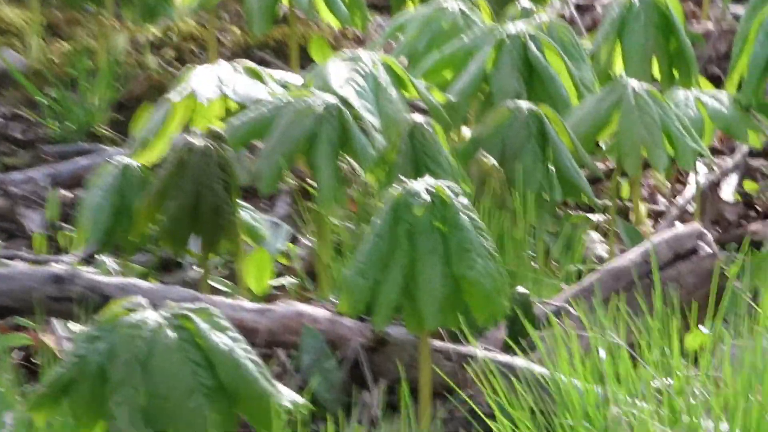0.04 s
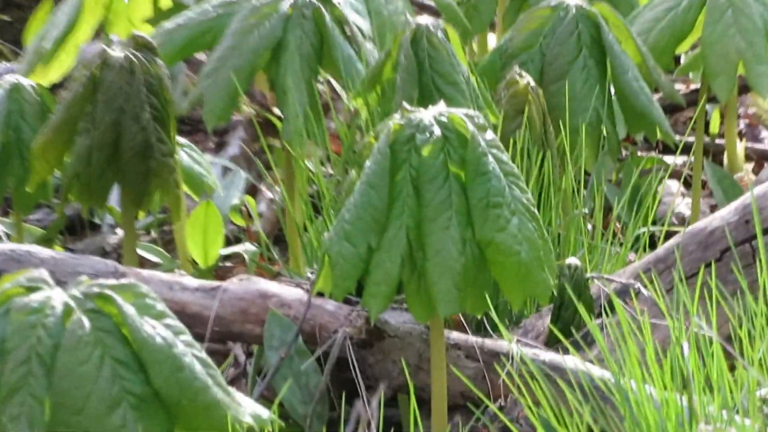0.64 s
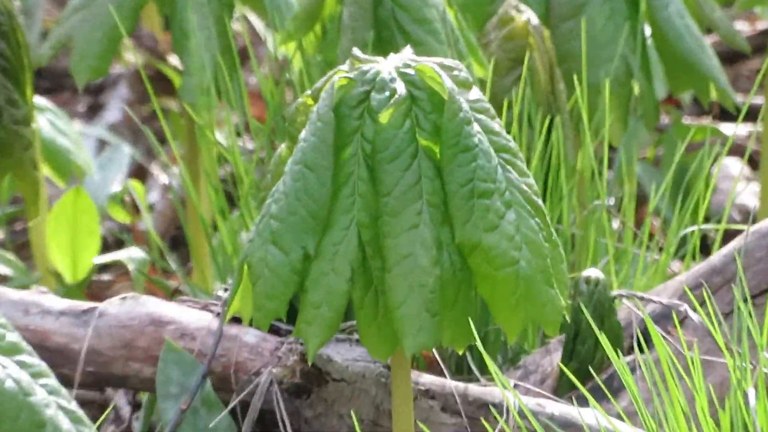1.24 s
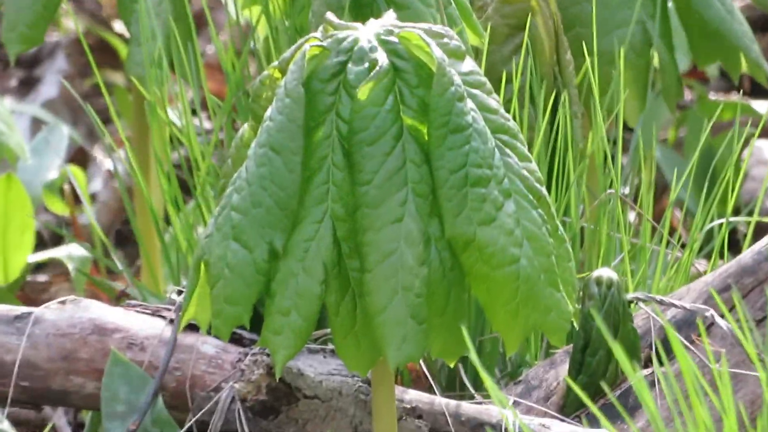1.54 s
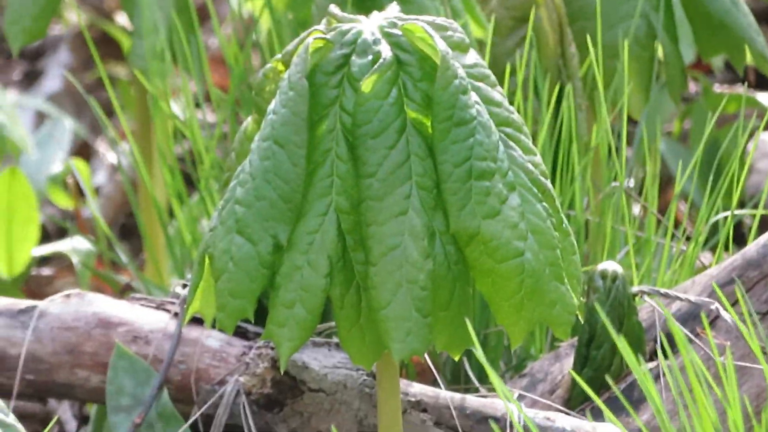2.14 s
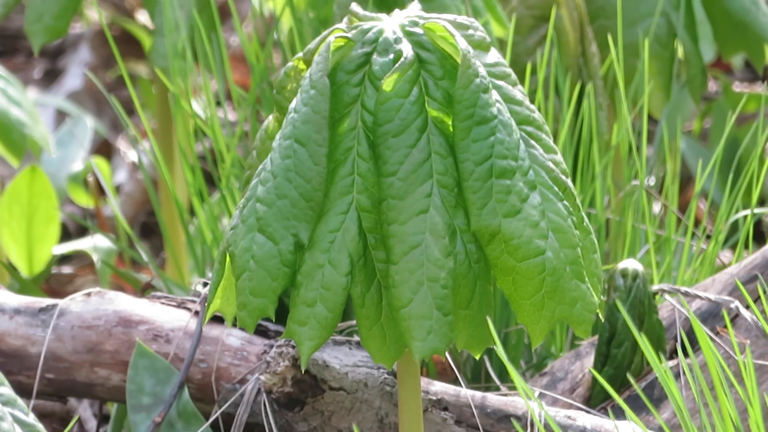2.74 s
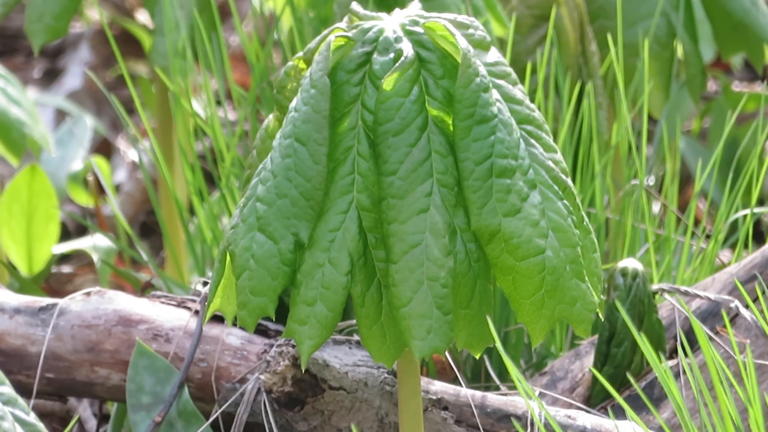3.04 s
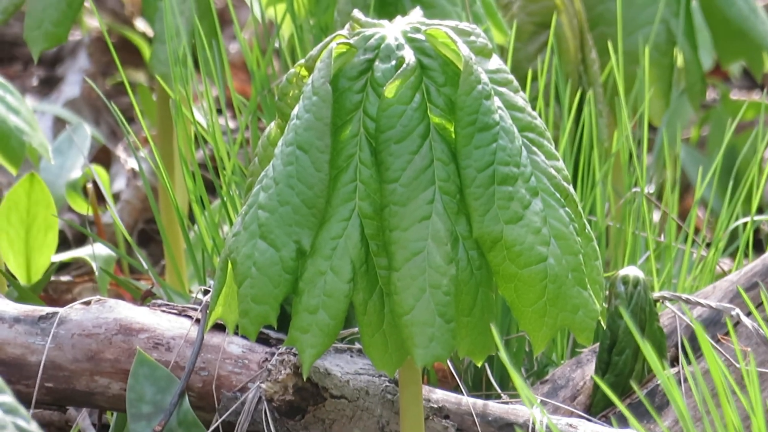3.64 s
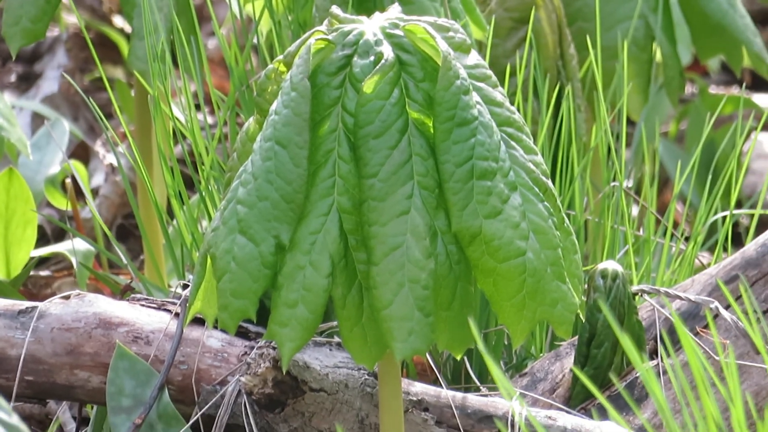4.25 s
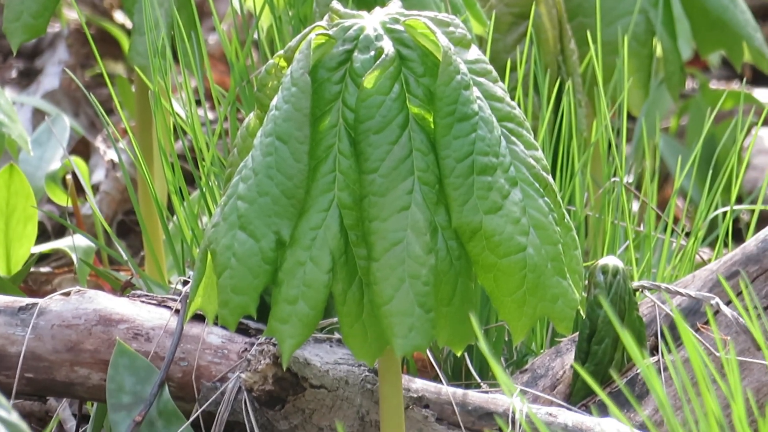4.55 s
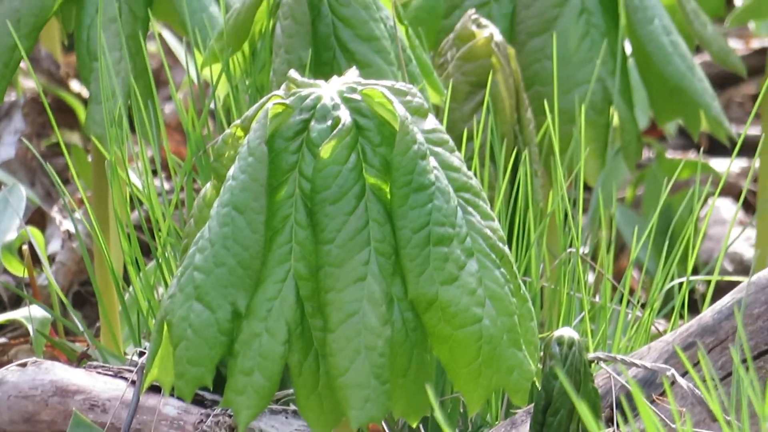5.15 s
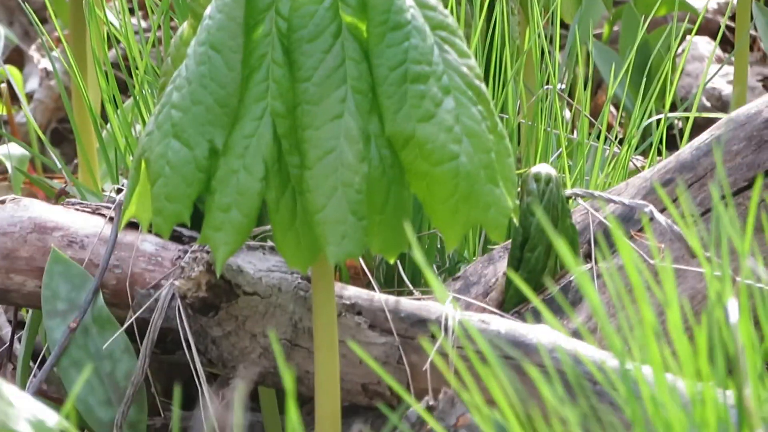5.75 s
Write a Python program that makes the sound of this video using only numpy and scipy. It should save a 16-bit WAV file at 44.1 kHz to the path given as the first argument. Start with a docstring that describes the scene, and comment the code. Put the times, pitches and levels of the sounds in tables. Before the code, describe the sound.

A treefrog gives two fast, raspy trills and a falling chirp in woods, with another frog farther off and a distant vehicle approaching.

```python
"""Spring woods near a distant road. A treefrog trills twice, then gives one falling chirp.
Each pulse is a rasp and a short upward slur through its throat and vocal sac; the trunks throw it back.
A second frog calls farther off. A vehicle slowly draws nearer, over hiss and soft buffets of air.
At first a camera's zoom motor hisses faintly, then stops with a tick."""
import sys
import numpy as np
from scipy import signal
from scipy.fft import rfft, irfft
from scipy.io import wavfile
from scipy.ndimage import uniform_filter1d

SR = 44100
rng = np.random.default_rng(int(sys.argv[2]) if len(sys.argv) > 2 else 0)


def output_pcm(signal):
    """Save a mono or channel-first signal as 16-bit PCM at the path in sys.argv[1].

    Samples are clipped to [-1, 1] before scaling.
    """
    pcm = np.clip(np.atleast_2d(signal).T, -1, 1) * 32767
    wavfile.write(sys.argv[1], SR, np.round(pcm).astype(np.int16))


N = 265173
TIME_S = np.arange(N) / SR
NOISE_BINS_HZ = np.fft.rfftfreq(2048, 1 / SR)

# Near frog, a long trill and a short one. Each row: start in seconds, level in dB,
# hoarseness (rasp share, 0-1), top pitch in Hz, overtone offset in dB.
TRILL_PULSES = [(0.64, -52, 0.18, 1084, 1), (0.706, -36, 0.084, 1134, -4.5),
                (0.771, -35.1, 0.058, 1151, -4.5), (0.841, -35, 0.13, 1125, -2.1),
                (0.911, -38, 0.14, 1120, -3), (0.974, -37.5, 0.26, 1100, -5),
                (1.04, -37.0, 0.17, 1088, -1.1), (1.11, -38.5, 0.27, 1091, -2),
                (1.179, -39.5, 0.31, 1106, 0), (1.252, -36.5, 0.26, 1102, -2), (1.323, -37, 0.28, 1079, -1),
                (1.402, -35, 0.16, 1123, 0), (1.474, -33, 0.25, 1108, -1.8), (1.551, -38, 0.31, 1071, -0.5),
                (1.625, -34.5, 0.21, 1108, -0.7), (1.7, -35, 0.3, 1068, 0), (1.78, -34.5, 0.39, 1098, -2),
                (1.861, -35, 0.37, 1068, -2.5), (1.949, -32.5, 0.24, 1115, 1),
                (2.031, -31.5, 0.27, 1141, -0.5), (2.113, -29.5, 0.21, 1114, -0.7),
                (2.188, -28, 0.21, 1117, -0.8), (2.27, -28, 0.18, 1109, -1), (2.347, -29, 0.17, 1120, 0.2),
                (2.423, -30, 0.27, 1102, -0.5), (2.501, -30, 0.2, 1097, -0.8),
                (2.579, -31, 0.283, 1094, -1), (2.663, -36, 0.44, 1097, 0.0),
                (2.748, -29, 0.21, 1110, -1.5), (4.611, -38.5, 0.05, 1120, -7.5),
                (4.672, -32, 0.091, 1119, -3.5), (4.722, -30.5, 0.17, 1106, 0.5),
                (4.774, -29.5, 0.27, 1107, -2.5), (4.83, -30.5, 0.2, 1103, -2.2),
                (4.893, -32, 0.28, 1090, 1), (4.956, -33.5, 0.33, 1082, 0.7), (5.026, -32, 0.3, 1067, 0),
                (5.095, -32.5, 0.46, 1074, 3), (5.165, -36, 0.59, 990, -10), (5.239, -41.5, 1.0, 1140, 1.8)]
# Throat and vocal sac response. Each row: frequency in Hz, gain in dB.
THROAT_RESPONSE = [(600, -38), (800, -29), (930, -5.5), (1070, 5.5), (1200, 1), (1360, 1.5), (1560, 7.5),
                   (1780, 0), (1910, 6.5), (2150, 3.5), (2330, -12), (2680, -14.5), (3090, -13.5),
                   (3300, -29.5), (4050, -27), (4600, -60), (5500, -70)]


def near_frog(jitter=0.017, shimmer=0.042, lock_s=0.0026, rasp_db=-8, grit_db=-16.5, attack_s=0.00053):
    """Each pulse locks from rasp into a rising tone; the second harmonic yields to the fundamental."""
    # Pulses lengthen along a trill. Each row: time in seconds, pulse length in seconds.
    pulse_lengths = [(.7, 0.02), (.91, 0.02), (1.1, 0.026), (1.8, 0.027), (2.3, 0.028), (2.75, 0.028),
                     (4.61, 0.034), (4.67, 0.0274), (4.76, 0.035), (5.1, .035), (5.24, 0.04)]
    # Each row: share of the slur, share of the top pitch.
    slur_curve = [(0, .65), (.2, .81), (.38, 0.84), (.7, 0.97), (.85, 0.96), (1, 1)]
    out, croak = np.zeros(N), rasp()
    order = np.arange(1, 6)[:, None]
    waver, flutter = drift(N, 500), drift(N, 500)
    for start_s, level_db, hoarse, top_hz, overtone_db in TRILL_PULSES:
        length_s, = follow(pulse_lengths, start_s)
        u = np.linspace(0, 1, int(length_s * SR))
        now = slice(int(start_s * SR), int(start_s * SR) + len(u))
        slur = ramp(u, 0.488 * hoarse)  # starts inside the rasp
        hz = top_hz * follow(slur_curve, slur)[0] * (1 + jitter * waver[now])
        closing_at = np.clip(0.7 + 0.1 * (level_db + 30), .3, .9)  # a harder push holds overtones longer
        closing = ramp(u, closing_at) ** 1.75
        second_db = overtone_db + 2 - 15.5 * closing
        upper_db = overtone_db - 1 + 11 * hoarse - 6.5 * closing
        gains = amp(colour(THROAT_RESPONSE, order * hz) + second_db * (order == 2) + upper_db * (order > 2))
        tone = unit((gains * np.sin(order * phase_rad(hz))).sum(0)) * (1 + shimmer * flutter[now])
        locked = .5 + .5 * np.tanh((u - 0.73 * hoarse) * length_s / lock_s)
        rasp_gain = (1 - locked) * amp(rasp_db) + locked * (1 - closing) * amp(grit_db)
        voice = locked * tone + amp(21.5 * hoarse) * rasp_gain * croak[now]
        pressure = (1 - np.exp(-u * length_s / attack_s)) * np.tanh((1 - u) * 14) ** 2
        leak = amp(-10 * hoarse * u ** 2)  # a hoarse pulse loses air
        add(out, start_s, amp(level_db) * unit(voice * pressure * leak))
    return out


def rasp(slap_hz=500, uneven=.25, onset_s=.0013, band_hz=(1050, 3800), sac_hz=1700, sac_width_hz=380):
    """Uneven vocal cord slaps open each pulse, ringing the sac and throat."""
    slaps = np.zeros(N)
    gaps_s = np.exp(uneven * rng.standard_normal((len(TRILL_PULSES), 18))) / slap_hz
    for (start_s, *_), row in zip(TRILL_PULSES, gaps_s):
        slaps[((start_s + onset_s + np.cumsum(row) - row[0]) * SR).astype(int)] = 1
    slaps = signal.sosfilt(signal.butter(2, band_hz, "bandpass", fs=SR, output="sos"), slaps)
    slaps += amp(6) * resonate(slaps, sac_hz, sac_width_hz)
    hz = np.fft.rfftfreq(N, 1 / SR)
    treble_db = 3 * np.clip(hz / 1000 - 2, 0, 1)
    croak = irfft(rfft(slaps) * amp(colour(THROAT_RESPONSE, hz) + treble_db), N)
    return croak / np.sqrt(np.sum(croak ** 2) / (gaps_s.sum() * SR))  # rms 1 while the cords slap


def chirp(start_s=5.4305, length_s=0.057, pitch_hz=746, sag=0.204, jitter=0.0081, shimmer=.08):
    """One lower note through the same throat: it swells, then sags in pitch and dies."""
    out, u = np.zeros(N), np.linspace(0, 1, int(length_s * SR))
    order = np.arange(1, 6)[:, None]
    hz = pitch_hz * (1 - sag * u ** 5.1) * (1 + jitter * drift(len(u), 400))
    level_db = -37.5 + 5 * np.exp(-((u - 0.62) / 0.25) ** 2)
    gains = amp(colour(THROAT_RESPONSE, order * hz) - order)  # tilt: -1 dB per harmonic
    voice = (gains * np.sin(order * phase_rad(hz))).sum(0) * (1 + shimmer * drift(len(u), 400))
    add(out, start_s, amp(level_db) * unit(voice) * signal.windows.tukey(len(u), .08))
    return out


def far_frog(pulse_s=0.0293, rise=0.097, octave_db=-20, jitter=0.006):
    """Slightly uneven trills; distance leaves little but each pulse's rising fundamental."""
    # Each row: start, end and pulse period in seconds, first level in dB, slope in dB/s, pitch in Hz.
    trills = [(0.027, .135, .072, -46.5, -78, 1175), (.25, .6, 0.073, -61, -6, 1240),
              (4.228, 4.72, .0651, -43.5, 0.5, 1219)]
    out, u = np.zeros(N), np.linspace(0, 1, int(pulse_s * SR))
    for start_s, end_s, period_s, first_db, db_per_s, pitch_hz in trills:
        for at_s in np.arange(start_s, end_s, period_s):
            phase = phase_rad(pitch_hz * (1 + rise * (u - .5) + jitter * drift(len(u), 200)))
            pulse = unit(np.sin(np.pi * u) * (np.sin(phase) + amp(octave_db) * np.sin(2 * phase)))
            level_db = first_db + db_per_s * (at_s - start_s) - rng.standard_normal()
            add(out, at_s, amp(level_db) * pulse)
    return out


def with_echoes(x):
    """The call, its echoes off the ground and nearest trunks, and narrow tones that linger."""
    # Each row: delay in seconds, gain in dB.
    echoes = [(.00366, -27), (.00463, -27.5), (.00575, -23), (.00632, -14.5), (0.0136, -17)]
    # Each row: frequency in Hz, bandwidth in Hz, gain in dB.
    lingering_tones = [(1560, 45, -5), (1933, 19.5, -5.5), (3040, 25, 8.5)]
    out = x.copy()
    for delay_s, db in echoes:
        add(out, delay_s, amp(db) * x)
    for hz, width_hz, db in lingering_tones:
        out += amp(db) * resonate(x, hz, width_hz)
    return out


def woods(x, gap_s=.022, taps_per_s=2500, early_db=2, early_s=0.038, width=0.21):
    """Scattering off many trunks: a short gap, a dense cluster, a faint long tail."""
    # Each row: frequency in Hz, t60 in seconds, relative level in dB.
    decay_bands = [(500, 0.4, -10), (1000, 0.39, 1.5), (1700, 0.63, -1.5), (1950, 0.27, 1), (2150, 0.25, 4),
                   (2580, 0.82, -6.5), (3150, 0.81, 0.5), (10000, 0.52, 1)]
    t = np.arange(SR) / SR
    taps = rng.standard_normal((2, SR)) * (rng.random((2, SR)) < taps_per_s / SR) * (t > gap_s)
    hz, age_s, bins = signal.stft(taps * (1 + amp(early_db) * np.exp(-t / early_s)), SR, nperseg=256)
    t60_s, tint_db = follow(decay_bands, hz[:, None])
    tails = signal.istft(bins * amp(tint_db - 60 * age_s / t60_s), SR, nperseg=256)[1]
    middle, side = signal.fftconvolve(x[None], tails / np.linalg.norm(tails[0]), axes=1)[:, :N]
    return np.array([middle + width * side, middle - width * side])


def road(engine_hz=79.1, slowing_from_s=2.5, slowing_hz_per_s=1.7, octave_db=-15):
    """The vehicle's approach lifts the tyre roar and, less, the rumble; its engine slows."""
    # Each row: time in seconds, level in dB.
    engine_levels = [(.5, -52), (2.5, -49.5), (3.2, -47), (3.35, -40.5), (5.3, -41.5), (6.01, -48.5)]
    tyre_levels = [(0, -54.5), (1.5, -52.5), (2.3, -48), (4.5, -46.5), (5.8, -40)]
    # Each row: frequency in Hz, relative density in dB.
    rumble_spectrum = [(20, -30), (35, -14.5), (60, -1), (100, 1), (130, -3), (170, -7.5), (220, -16.5),
                       (300, -29.5), (600, -31.5), (1500, -74)]
    tyre_spectrum = [(200, -12), (450, -9.5), (620, -12), (800, 1), (950, 4.5), (1200, -4.5), (1600, -5),
                     (2000, -6.5), (2600, -14.5), (4000, -23), (8000, -35.5), (15000, -42.5)]
    # Each row: frequency in Hz, left-right correlation.
    tyre_likeness = [(300, 0.27), (900, 1), (2000, 0.85), (4000, 0.62), (8000, 0.11)]
    phase = phase_rad(engine_hz - slowing_hz_per_s * np.maximum(TIME_S - slowing_from_s, 0))
    note = unit(np.sin(phase) + amp(octave_db) * np.sin(2 * phase))
    engine = amp(follow(engine_levels, TIME_S)[0]) * note
    roar_db, = follow(tyre_levels, TIME_S)
    rumble_db = -41.5 + 0.27 * (roar_db - roar_db.mean())
    rumble = amp(rumble_db) * noise(rumble_spectrum, likeness=0.99, patchy_db=1.06)
    tyres = amp(roar_db) * noise(tyre_spectrum, colour(tyre_likeness, NOISE_BINS_HZ))
    return engine + rumble + tyres


def zoom_motor(level_db=-53, stop_s=1.72, run_down_s=.02):
    """Motor hiss drives the two microphone ports in antiphase until the lens stops."""
    # Each row: frequency in Hz, relative density in dB.
    motor_spectrum = [(400, -7), (1000, -7), (2500, -2), (4500, -6.5), (8000, -13.5), (11500, -19),
                      (15000, -25)]
    running = .5 - .5 * np.tanh((TIME_S - stop_s) / run_down_s)
    return amp(level_db) * running * noise(motor_spectrum, likeness=-1)


def lens_ticks(attack_s=0.00054, scrape_s=0.0027):
    """Small snaps of the lens ring a few short modes, with a trace of scraping."""
    # Each row: start in seconds, peak in dB, phase between ports in radians, tilt in dB/octave.
    snaps = [(1.656, -43, 1.75, 12), (1.7598, -26, 1.1, 1), (5.668, -39, 2, 16)]
    # Each row: frequency in Hz, relative level in dB, t60 in seconds.
    lens_modes = [(1790, 0, 0.043), (3320, -9, 0.031), (3653, 13, 0.0062), (7377, 0, 0.003),
                  (12433, -22, 0.0033)]
    out, t = np.zeros((2, N)), np.arange(SR // 40) / SR
    for start_s, peak_db, apart_rad, db_per_octave in snaps:
        ring = sum(amp(db + db_per_octave * np.log2(hz / 4000) - 60 * t / t60_s)
                   * np.sin(2 * np.pi * hz * t) for hz, db, t60_s in lens_modes)
        scrape = 0.15 * rng.standard_normal(len(t)) * np.exp(-t / scrape_s)
        tick = (ring + scrape) * (1 - np.exp(-t / attack_s))
        analytic = signal.hilbert(amp(peak_db) * tick / abs(tick).max())
        for port, shift_rad in zip(out, (apart_rad / 2, -apart_rad / 2)):
            add(port, start_s, (analytic * np.exp(1j * shift_rad)).real)
    return out


def air(buffet_hz=55, lead_rad=0.37):
    """Even hiss of air and microphone; soft low buffets reach the left port first."""
    # Each row: start in seconds, length in seconds, level in dB.
    buffets = [(3.312, 0.066, -33), (3.387, 0.06, -41), (3.523, 0.12, -35), (3.644, 0.19, -45),
               (5.331, 0.077, -41)]
    # Each row: time in seconds, level in dB.
    hiss_levels = [(0, -46.5), (5, -51), (6.01, -50.5)]
    # Each row: frequency in Hz, relative density in dB.
    hiss_spectrum = [(40, -43), (200, 3.5), (350, 2.5), (600, -6), (1000, -8.5), (2000, -16), (4000, -20),
                     (7000, -25.5), (10000, -31), (13000, -38.5), (15500, -45)]
    # Each row: frequency in Hz, left-right correlation.
    hiss_likeness = [(500, 0.057), (2000, 0.028), (6000, 0.58)]
    pushes = np.zeros((2, N))
    for start_s, length_s, level_db in buffets:
        n = int(length_s * SR)
        phase = phase_rad(buffet_hz * (1 + 0.23 * drift(n, 40)))
        for port, shift_rad in zip(pushes, (lead_rad, -lead_rad)):
            add(port, start_s, amp(level_db) * np.hanning(n) * np.sqrt(2) * np.sin(phase + shift_rad))
    hiss = noise(hiss_spectrum, colour(hiss_likeness, NOISE_BINS_HZ), patchy_db=0.8)
    return pushes + amp(follow(hiss_levels, TIME_S)[0]) * hiss


def noise_suppressor(x, strength=2.6, floor_db=-4):
    """Turns down bins that stand little above their usual level, most while the lens zooms."""
    # Each row: time in seconds, share of the dB cut applied.
    depth_curve = [(1.6, 0.78), (1.75, 0.21)]
    _, t, bins = signal.stft(x, SR, nperseg=512)
    power = blur((abs(bins) ** 2).mean(0), 3, 2)
    usual = np.median(power[:, t < depth_curve[0][0]], axis=1, keepdims=True)
    gain = np.maximum(power / (power + strength * usual + 1e-20), amp(floor_db))
    depth, = follow(depth_curve, t)
    return signal.istft(bins * gain ** depth, SR, nperseg=512)[1][:, :N]


def noise(spectrum, likeness, patchy_db=1.0):
    """Coloured stereo noise, rms 1, its level wandering in small patches of time and frequency."""
    a, b, c, d, patches = rng.standard_normal((5, N // 512 + 5, len(NOISE_BINS_HZ)))
    gain = amp(colour(spectrum, NOISE_BINS_HZ) + patchy_db * unit(blur(patches, 8, 14)))
    middle, side = np.sqrt(1 + likeness) * (a + 1j * b), np.sqrt(1 - likeness) * (c + 1j * d)
    bins = np.array([middle + side, middle - side]) * gain
    return unit(signal.istft(bins.transpose(0, 2, 1), nperseg=2048, noverlap=1536)[1][:, :N])


def drift(n, hz):
    """Smooth random wander, rms about 1, bandwidth hz."""
    lowpass = np.exp(-(np.fft.rfftfreq(SR, 1 / SR) / hz) ** 2)
    return np.resize(unit(irfft(rfft(rng.standard_normal(SR)) * lowpass, SR)), n)


def amp(db):
    """Decibels to gain."""
    return 10 ** (np.asarray(db) / 20)


def unit(x):
    """Scales to rms 1."""
    return x / np.sqrt(np.mean(x ** 2) + 1e-20)


def phase_rad(hz):
    """Running phase of a pitch curve."""
    return 2 * np.pi * np.cumsum(hz) / SR


def ramp(u, start):
    """0 until u = start, rising to 1 at u = 1."""
    return np.clip((u - start) / (1 - start), 0, 1)


def resonate(x, hz, width_hz):
    """One resonance, unity gain at its peak."""
    return signal.lfilter(*signal.iirpeak(hz, hz / width_hz, fs=SR), x)


def blur(grid, rows, columns):
    """Moving average along both axes."""
    return uniform_filter1d(uniform_filter1d(grid, rows, axis=0), columns, axis=1)


def colour(points, hz):
    """Reads a spectrum on a log-frequency axis."""
    points_hz, values = np.transpose(points)
    return np.interp(np.log(hz + 1), np.log(points_hz), values)


def follow(rows, at):
    """Interpolates each later column against the first."""
    place, *columns = np.transpose(rows)
    return [np.interp(at, place, column) for column in columns]


def add(mix, start_s, sound):
    """Mixes a sound in at start_s."""
    part = mix[max(round(start_s * SR), 0):][:len(sound)]
    part += sound[:len(part)]


def scene(near_wet_db=-12.5, far_wet_db=-8, near_left_db=0.7, far_right_db=1.5):
    """Near frog slightly left, far frog right; road and air all around."""
    near, far = near_frog() + chirp(), far_frog()
    frogs = with_echoes(near) * amp([[near_left_db], [-near_left_db]])
    frogs += far * amp([[-far_right_db], [far_right_db]])
    reverb = woods(amp(near_wet_db) * near + amp(far_wet_db) * far)
    return frogs + reverb + zoom_motor() + lens_ticks() + road() + air()


def record(dry):
    """The camera's noise suppressor, then its band limit."""
    cutoff_hz = 15450
    lowpass = signal.firwin(511, cutoff_hz, window=("kaiser", 9), fs=SR)
    return signal.oaconvolve(noise_suppressor(dry), lowpass[None], "same")


dry = scene()
out = record(dry)
output_pcm(out)
```